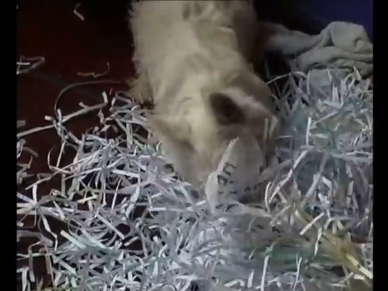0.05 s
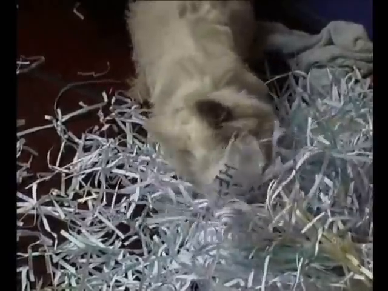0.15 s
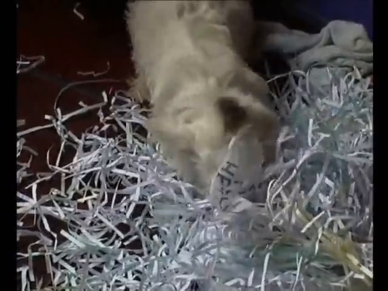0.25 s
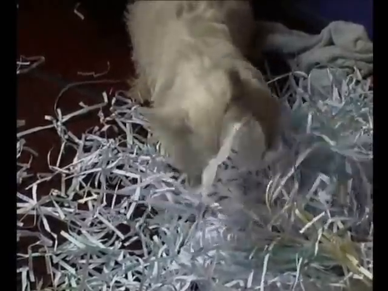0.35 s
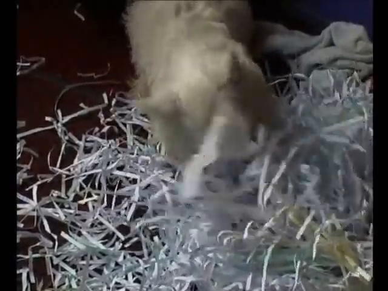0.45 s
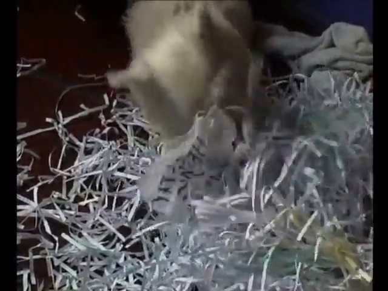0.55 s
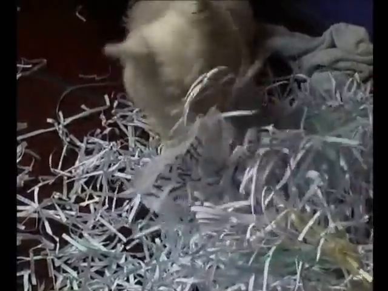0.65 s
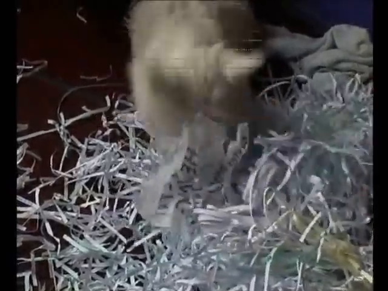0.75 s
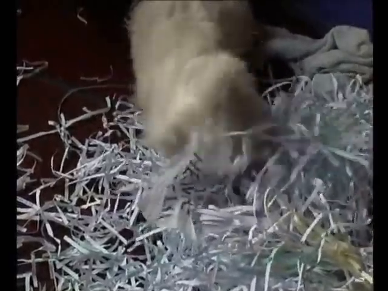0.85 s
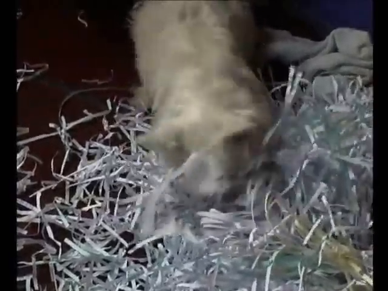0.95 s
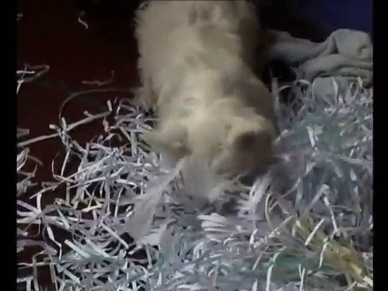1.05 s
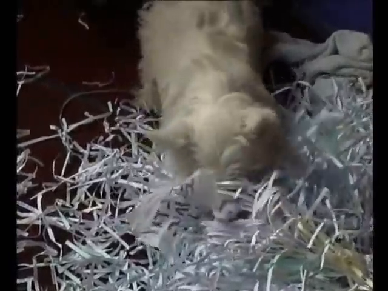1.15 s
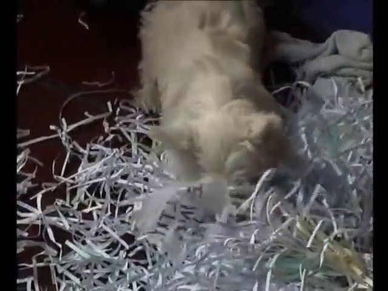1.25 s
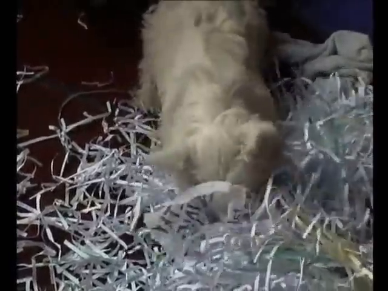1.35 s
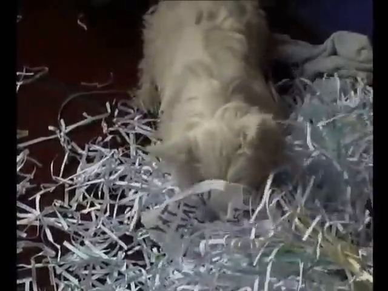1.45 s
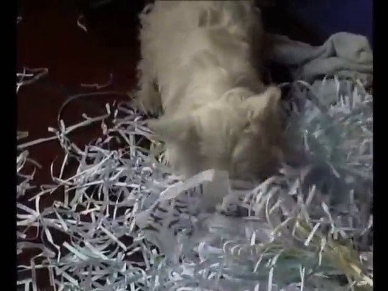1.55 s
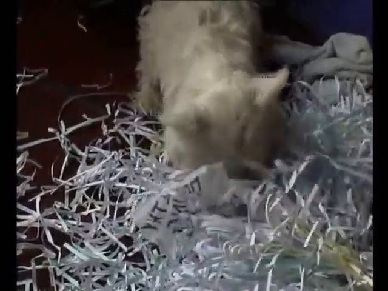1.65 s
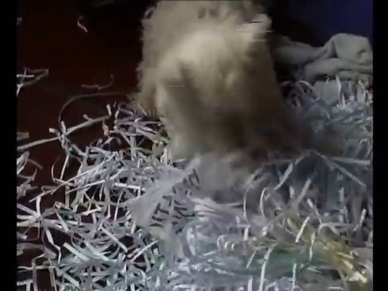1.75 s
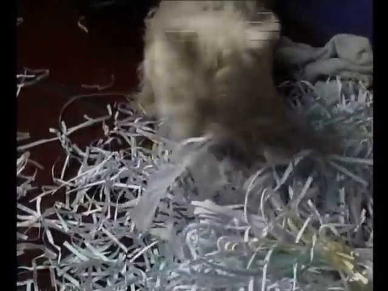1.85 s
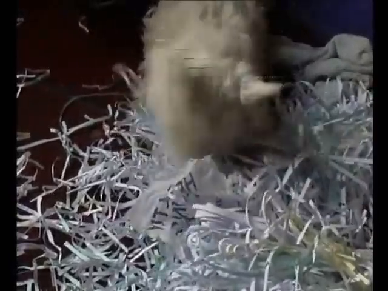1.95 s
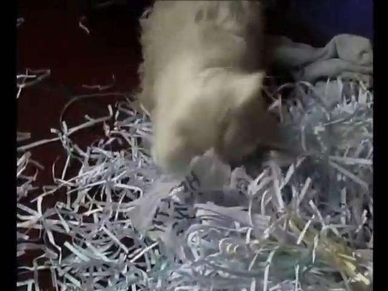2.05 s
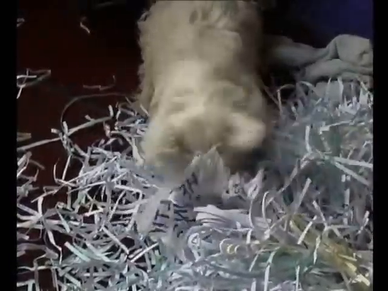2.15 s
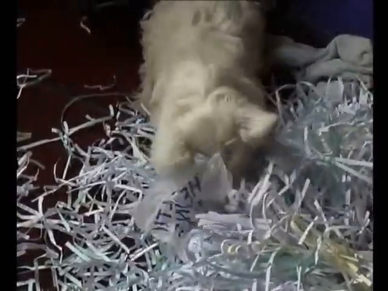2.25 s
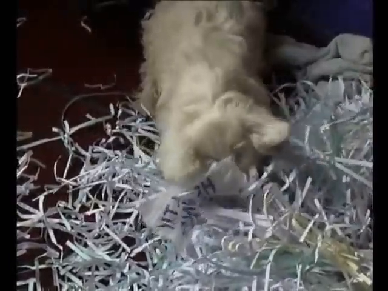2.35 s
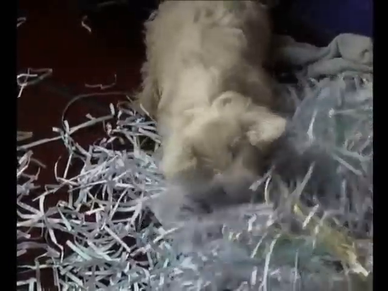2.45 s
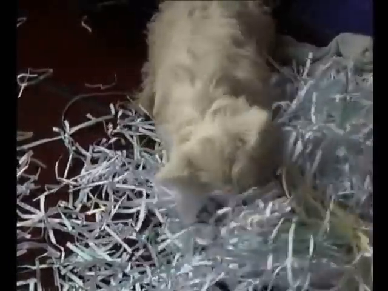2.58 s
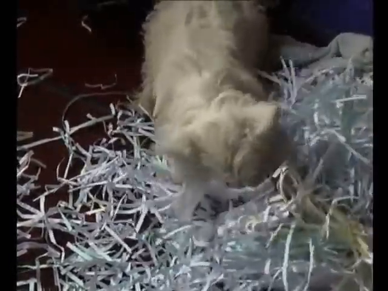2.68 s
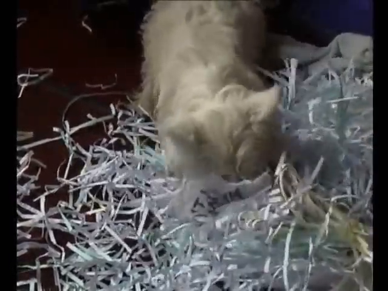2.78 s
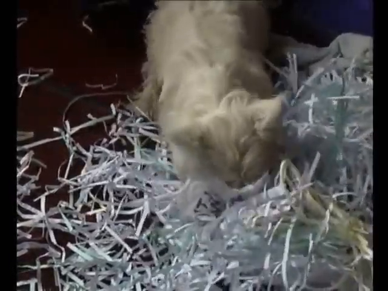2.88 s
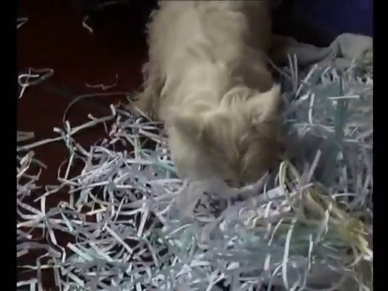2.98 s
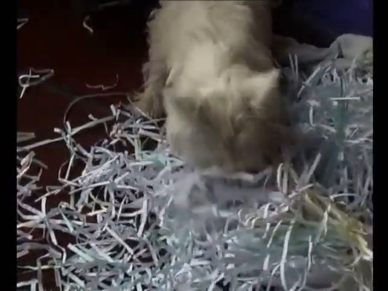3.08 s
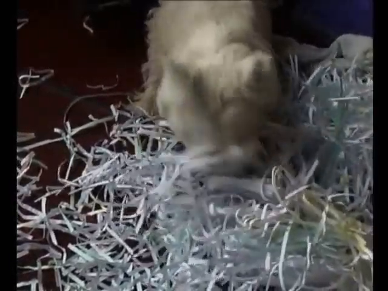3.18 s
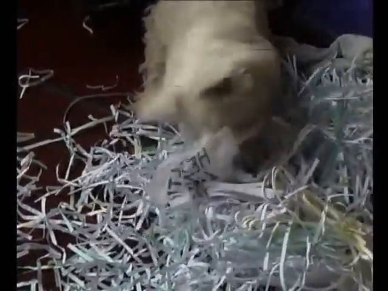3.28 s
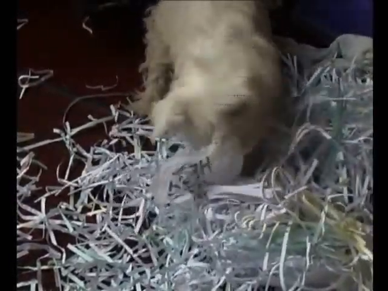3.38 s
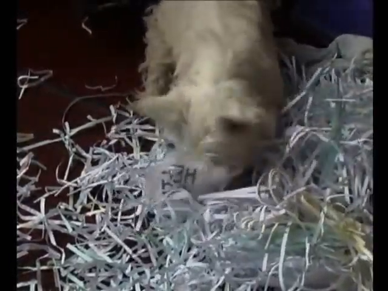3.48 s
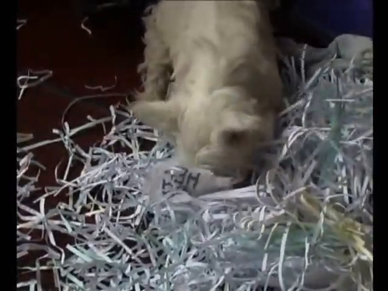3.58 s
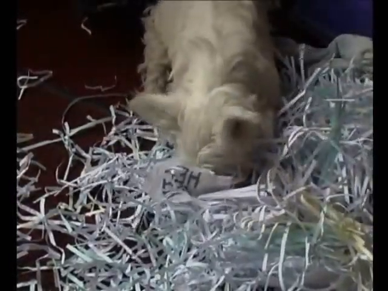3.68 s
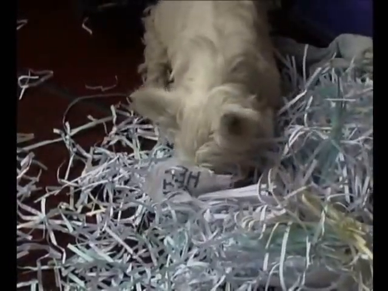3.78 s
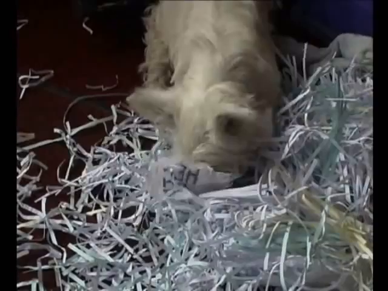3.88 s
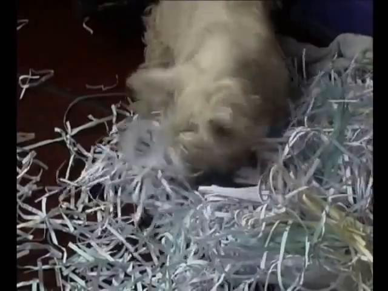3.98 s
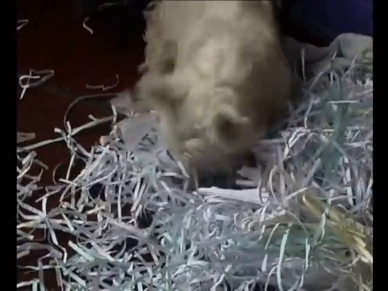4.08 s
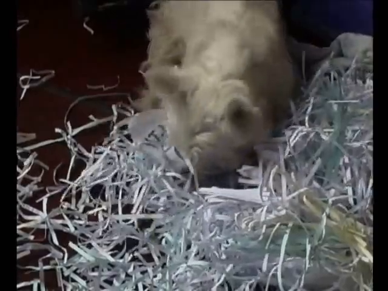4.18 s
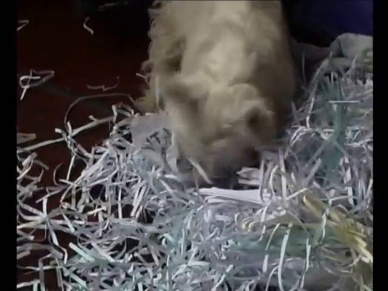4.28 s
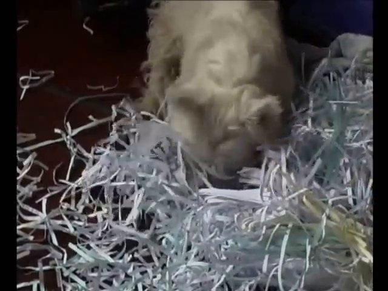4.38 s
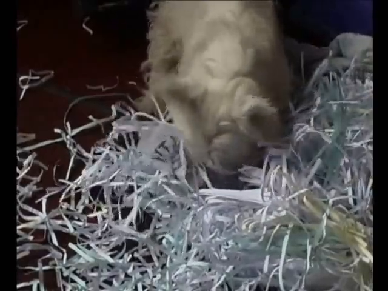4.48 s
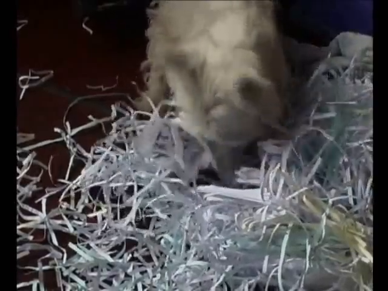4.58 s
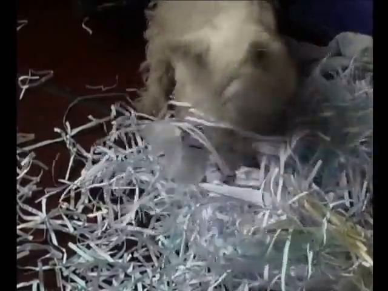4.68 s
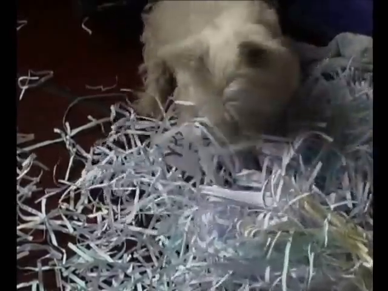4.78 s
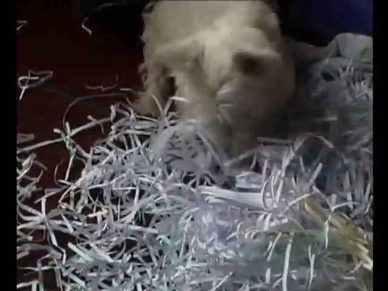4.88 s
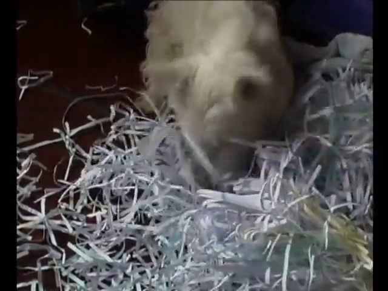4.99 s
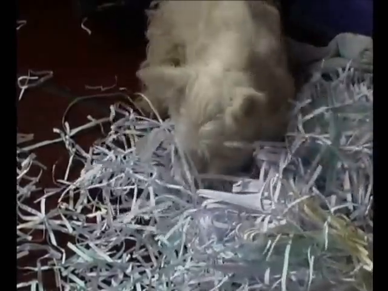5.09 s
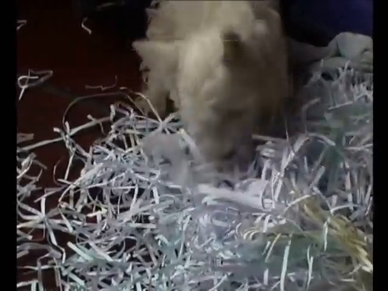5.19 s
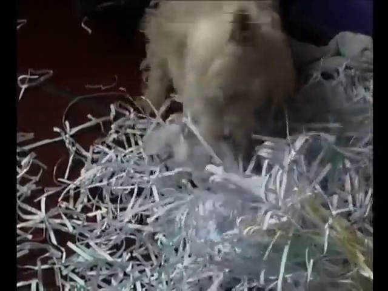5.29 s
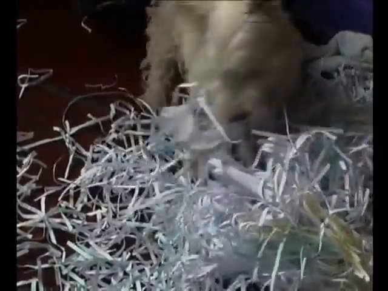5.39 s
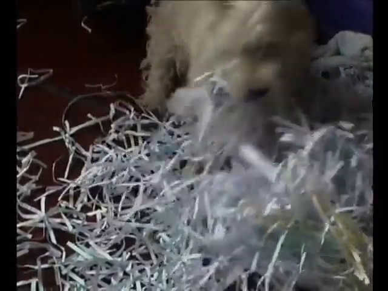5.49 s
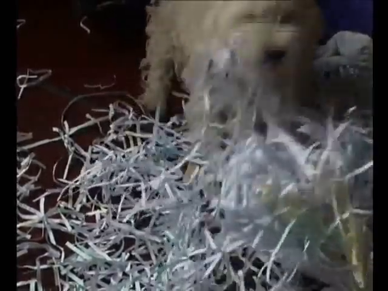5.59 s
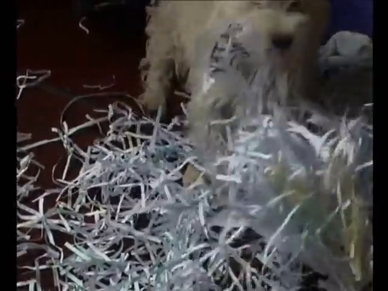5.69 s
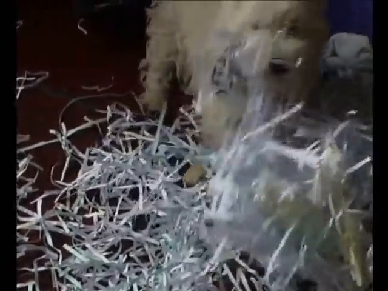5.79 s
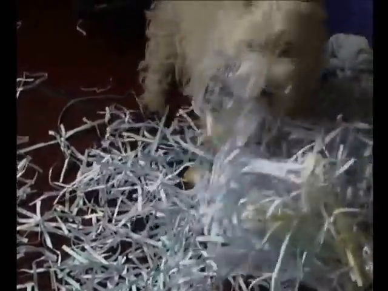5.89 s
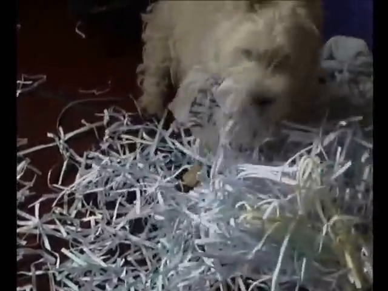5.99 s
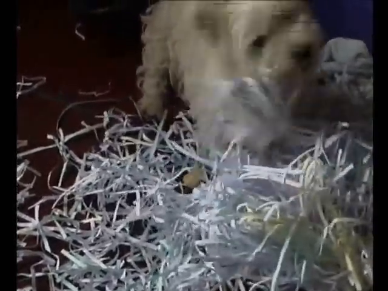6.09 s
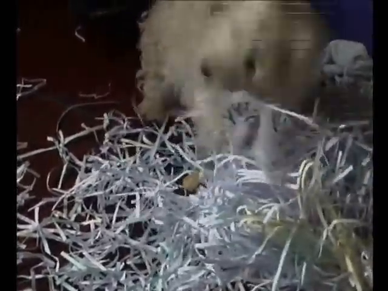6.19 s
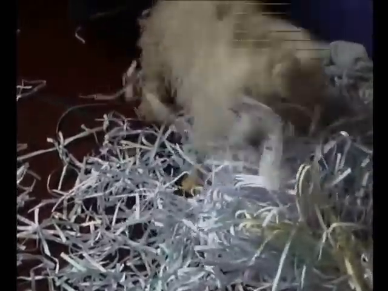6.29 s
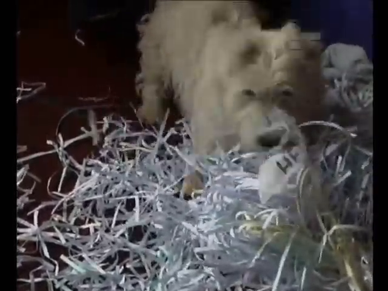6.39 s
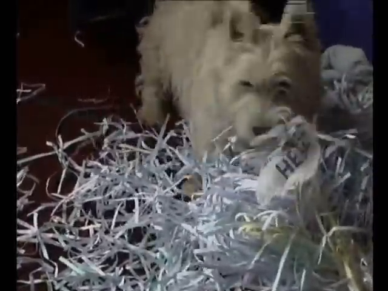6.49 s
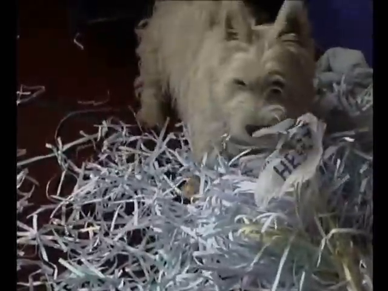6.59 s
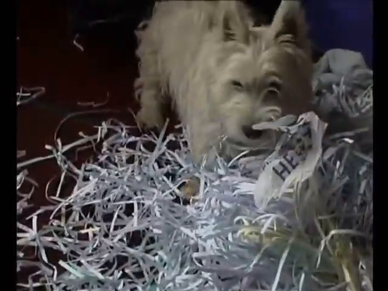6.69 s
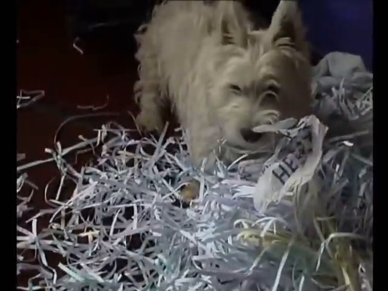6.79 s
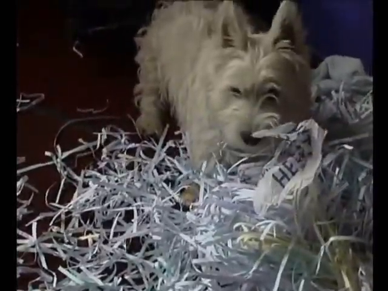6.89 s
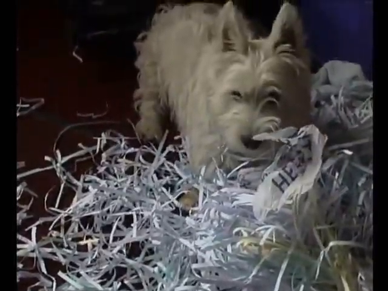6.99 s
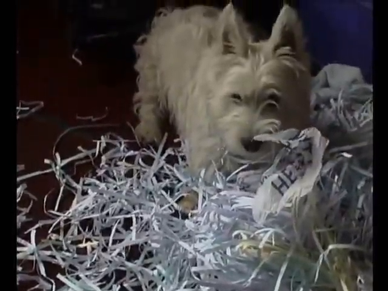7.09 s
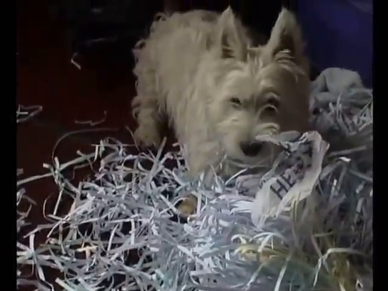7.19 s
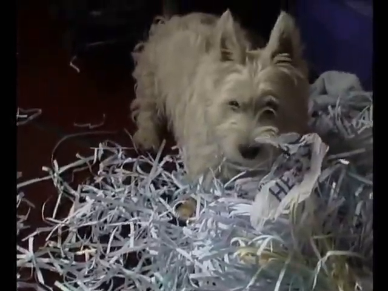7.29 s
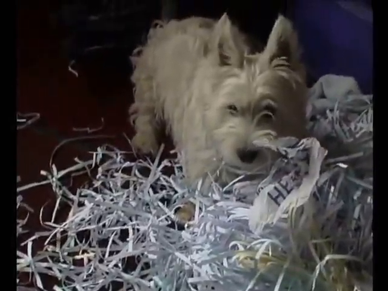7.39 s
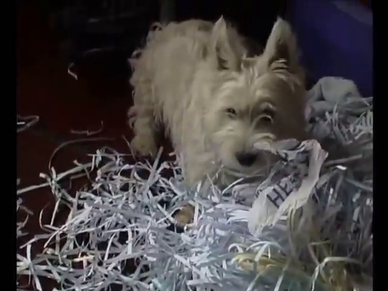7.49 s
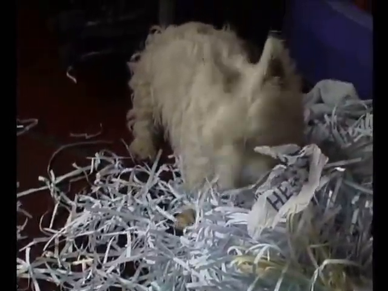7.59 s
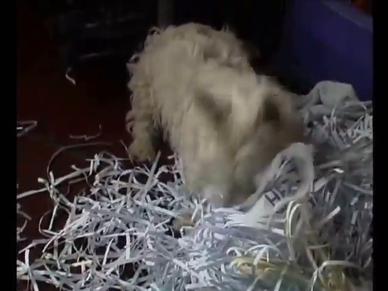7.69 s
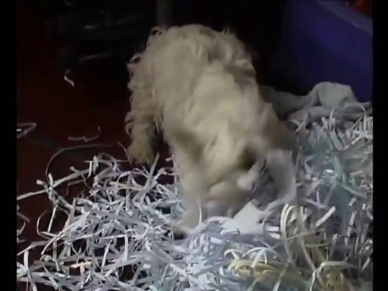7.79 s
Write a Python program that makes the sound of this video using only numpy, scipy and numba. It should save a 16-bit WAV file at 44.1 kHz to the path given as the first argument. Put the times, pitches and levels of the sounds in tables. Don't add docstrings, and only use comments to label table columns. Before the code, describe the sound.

A small dog noses and paws through shredded paper on a hard floor. Small rustles grow into dense crackling bursts with claw clicks and soft thumps, then a cluster of hard knocks and the strongest shake past the middle. It dies to near quiet, with a thin nostril whistle and tiny ticks, before a last soft rustle. Close stereo microphone, small indoor room, faint hum and hiss.

```python
import sys
import numpy as np
from scipy import signal
from scipy.fft import rfft, irfft, next_fast_len
from scipy.io import wavfile
from scipy.ndimage import uniform_filter1d
from numba import njit

SR = 44100
rng = np.random.default_rng(int(sys.argv[2]) if len(sys.argv) > 2 else 0)


def transcribe(u):
    v = np.clip(np.atleast_2d(u).T, -1, 1)
    q = np.round(v * 32767).astype(np.int16)
    wavfile.write(sys.argv[1], SR, q)


def decibels_to_gain(level_db):
    exponent = np.asarray(level_db, float) / 20
    return 10 ** exponent


N = 346185


def on_log(table, hz):
    f, v = np.transpose(table)
    return np.interp(np.log(hz), np.log(f), v)


def band(x, lo_hz, hi_hz):
    y = signal.sosfilt(signal.butter(2, [lo_hz, hi_hz], "band", fs=SR, output="sos"), x)
    return y / np.sqrt(np.mean(y ** 2))


def walk(rate_hz):
    k = int(SR / rate_hz)
    held = np.repeat(rng.standard_normal(N // k + 1), k)
    return 1.4 * uniform_filter1d(held, k)[:N]


def stereo(mid, side):
    return np.array([mid + side, mid - side])


def add(out, s, sound):
    i = int(s * SR)
    out[i:i + len(sound)] += sound[:N - i]


def ring(hz, t60_s, rise_s):
    t = np.arange(int(.25 * SR)) / SR
    push = 1 - np.exp(-t / rise_s)
    return np.sin(2 * np.pi * hz * t) * push * np.exp(-np.log(1000) * t / max(t60_s, .003))


def snaps(rate_hz, spread_db):
    when, large, sign, kept = rng.random((int(N / SR * 6000), 4)).T
    size = decibels_to_gain(-spread_db * np.log(1 - large)) * (2 * sign - 1) * (kept < rate_hz / 6000)
    x = np.bincount((when * N).astype(int), size, N)
    return x / np.sqrt(np.mean(x ** 2))


LAYER_HZ = [300, 1200, 1900, 5500, 10000]
# (frequency [Hz], density [dB per Hz])
PAPER = [(170, -7), (290, -9.5), (480, -8), (620, -3.5), (950, -3), (1200, -4), (1500, -2.5), (1900, -1),
         (2400, -1.5), (3000, -1.5), (5000, -2), (7000, -1), (9600, -5.5), (12300, -12)]
# (frequency [Hz], side minus mid [dB])
WIDTH = [(200, 0), (550, -9.5), (850, -6.5), (1400, -5), (3000, -5), (6500, -5), (8200, -3.5),
         (10000, -0.5), (12500, -3.5)]


def paper():
    crackle, heap, sheets, strips = stirring()
    layers = [heap, sheets, np.zeros(N), strips]
    shared = [snaps(900, 2.3), snaps(900, 1.9)]
    surge = 1.02 * walk(30)
    out = 0
    for hz in 190 * 2 ** np.arange(0, 6.2, 1 / 3):
        rate_hz = 4500 * np.clip(hz / 3000, .3, 1.3)
        lo_hz, hi_hz = hz * 2 ** (-1 / 6), hz * 2 ** (1 / 6)
        mid, side = (band(snaps(rate_hz, 1.3) + 0.56 * big, lo_hz, hi_hz) for big in shared)
        place = np.interp(np.log(hz), np.log(LAYER_HZ), [0, 1, 2, 2, 3])
        low = min(int(place), 2)
        colour = layers[low] + (place - low) * (layers[low + 1] - layers[low])
        density_db = on_log(PAPER, hz) + 10 * np.log10(hz / 4000)
        db = crackle + colour + density_db + surge + 1.1 * walk(18) - 5
        out = out + decibels_to_gain(db) * stereo(mid, decibels_to_gain(on_log(WIDTH, hz)) * side)
    return out


SHOVE_RISE_S, EDGE_DB = .06, 2.5


def swell(t, s, held_s, db, rise_s, fall_s):
    early = np.maximum(s - t, 0) / max(rise_s, .005)
    late = np.maximum(t - s - held_s, 0) / max(fall_s, .005)
    away = early + late
    return decibels_to_gain(2 * np.maximum(db - (10 - EDGE_DB) * away - EDGE_DB * away ** 2, -200))


# (time [s], crackle [dB])
CREEP = [(0.0, -59.6), (0.35, -64.9), (0.8, -61.7), (0.97, -58.8), (1.3, -67.2), (1.72, -55.5),
         (1.97, -66.5), (2.32, -66.7), (2.73, -55.0), (3.12, -57.8), (3.44, -70.7), (3.86, -67.4),
         (3.98, -74.6), (4.37, -57.0), (4.92, -64.9), (6.1, -67.6), (6.55, -69.8), (6.78, -84.8)]
# (peak time [s], crackle [dB], rise [s per 10 dB], fall [s per 10 dB], thin strips [dB re usual])
FLICKS = [(0.048, -55.6, 0.018, 0.024, -4.8), (0.308, -55.6, 0.031, 0.018, -0.5),
          (0.705, -53.0, 0.014, 0.057, -0.9), (1.384, -41.8, 0.067, 0.095, -3.3),
          (1.783, -43.2, 0.034, 0.072, -0.9), (1.879, -46.1, 0.06, 0.035, 1.6),
          (2.255, -59.0, 0.455, 0.104, -1.1), (2.37, -53.9, 0.048, 0.012, 0.8),
          (2.492, -47.0, 0.082, 0.012, -2.2), (2.612, -41.1, 0.115, 0.044, -0.4),
          (2.845, -49.7, 0.064, 0.074, -2.7), (2.956, -43.7, 0.033, 0.051, -1.9),
          (4.251, -51.7, 0.027, 0.04, -0.9), (4.466, -50.6, 0.035, 0.231, -0.2),
          (4.593, -49.9, 0.019, 0.023, -0.0), (4.73, -47.5, 0.108, 0.091, 1.4),
          (4.756, -46.1, 0.016, 0.086, -3.9), (5.102, -55.0, 0.248, 0.077, 0.8),
          (5.156, -49.3, 0.031, 0.282, -0.9), (5.513, -39.8, 0.012, 0.026, -2.6),
          (6.19, -54.8, 0.069, 0.012, 2.3), (6.39, -59.5, 0.141, 0.08, 0.6),
          (7.771, -55.2, 0.046, 0.242, 4.4), (7.825, -53.5, 0.062, 0.125, -3.4)]
# (full from [s], held [s], crackle [dB], fall [s per 10 dB], thin strips [dB re usual])
SHOVES = [
    (0.491, 0.179, -51.7, 0.052, 3.2),
    (1.064, 0.12, -54.7, 0.225, -1.5),
    (1.562, 0.107, -55.2, 0.013, 0.6),
    (3.193, 0.015, -53.2, 0.182, -0.6),
    (3.515, 0.062, -49.7, 0.116, -1.6),
    (4.07, 0.012, -46.6, 0.103, 0.5),
    (5.342, 0.066, -45.1, 0.15, 0.1),
    (5.572, 0.173, -43.3, 0.044, -0.8),
    (5.831, 0.13, -53.8, 0.114, -1.0),
    (6.203, 0.129, -58.6, 0.016, -3.3),
]
# (time [s], heap and sheets [dB])
DEPTH = [(0, -1), (.9, .6), (1.5, -1), (2.9, -.6), (3.25, 2.6), (3.55, -1), (5.0, -.5), (5.3, 1),
         (5.6, -.3), (6.4, .8), (7.6, 2), (7.85, 3)]
CREEP_STRIPS_DB = 1.2
STRIPS_LAG_S, STRIPS_LINGER = 0.045, 0.32
SHEETS_LAG_S, SHEETS_LINGER = 0.032, 0.26
SHEETS_FOLLOW = .3
KNOCK_SHAKES_S, KNOCK_SHEETS_DB, KNOCK_HEAP_DB = 0.028, -24, -10.5
SHEETS_MAX_DB, HEAP_MAX_DB = 1, 3


def stirring():
    t = np.arange(0, N, 64) / SR
    moves = [(swell(t, s, 0, db, rise, fall), thin) for s, db, rise, fall, thin in FLICKS]
    moves += [(swell(t, s, held, db, SHOVE_RISE_S, fall), thin) for s, held, db, fall, thin in SHOVES]
    moves += [(decibels_to_gain(2 * np.interp(t, *np.transpose(CREEP))), CREEP_STRIPS_DB)]
    power = sum(p for p, _ in moves)
    thin_db = sum(p * thin for p, thin in moves) / power
    deep_db = np.interp(t, *np.transpose(DEPTH))
    crackle = 10 * np.log10(power)

    def behind(lag_s):
        return np.interp(t - lag_s, t, crackle) - crackle

    shaken = sum(swell(t, s, 0, db, .005, KNOCK_SHAKES_S) for s, db, *_ in KNOCKS) / power
    heap = 10 * np.log10(decibels_to_gain(-3.5) + decibels_to_gain(2 * KNOCK_HEAP_DB) * shaken) - 0.15 * (crackle + 52)
    heap = np.minimum(heap, HEAP_MAX_DB) + deep_db
    sheets = 10 * np.log10(decibels_to_gain(-1.0) + decibels_to_gain(2 * KNOCK_SHEETS_DB) * shaken) - 0.076 * (crackle + 52)
    sheets = sheets + SHEETS_FOLLOW * thin_db + SHEETS_LINGER * behind(SHEETS_LAG_S)
    sheets = np.clip(sheets, -6, SHEETS_MAX_DB) + deep_db
    strips = -1.5 + thin_db + np.clip(STRIPS_LINGER * behind(STRIPS_LAG_S), -7, 4)
    return [np.interp(np.arange(N) / SR, t, c) for c in (crackle, heap, sheets, strips)]


# (time [s], ring [dB], ring [Hz], second ring [Hz], snap [dB re ring])
KNOCKS = [(.442, -57, 830, 2500, 5), (1.657, -53, 980, 1820, 5), (1.871, -35, 1850, 1950, 5),
          (2.093, -46, 1550, 2040, -3.5), (2.110, -54, 650, 1300, -8), (2.126, -49, 690, 1300, -1),
          (2.837, -50, 806, 2030, 5), (3.017, -54, 614, 1730, 2), (3.874, -58, 620, 2280, 4),
          (4.714, -42, 700, 1890, -1), (4.737, -31, 696, 1110, -8), (4.757, -37, 514, 900, -8),
          (4.793, -29.5, 725, 1010, -6), (4.848, -36, 960, 1930, 0), (5.347, -35.5, 1850, 2700, 6),
          (5.367, -43, 1770, 2730, 6.5), (5.427, -31, 1100, 750, 4), (5.513, -33, 1900, 1100, 7),
          (5.561, -37, 1030, 2500, 5), (5.611, -44, 654, 2000, 5), (5.689, -39, 960, 3020, 2),
          (6.392, -53.5, 870, 1650, 2), (6.897, -60.5, 1360, 1990, -8), (7.704, -54, 620, 2100, 4.5)]
KNOCK_T60_S, KNOCK_T60_S_PER_DB = 0.017, .0003
FLOOR_ECHO_S = 0.00157


def knocks():
    mid, side = np.zeros(N), np.zeros(N)
    t = np.arange(int(.25 * SR)) / SR
    noise = rng.standard_normal((len(KNOCKS), 2, len(t)))
    snap = ring(2880, 0.0035, .00005) + .5 * ring(5700, 0.0028, .00005) + 0.42 * ring(1600, 0.0041, .00005)
    snap = snap - 0.6 * np.roll(snap, int(FLOOR_ECHO_S * SR))
    for (s, db, hz, upper_hz, snap_db), n in zip(KNOCKS, noise):
        t60_s = KNOCK_T60_S + KNOCK_T60_S_PER_DB * (db + 44)
        body = ring(hz, t60_s, 0.0004) + 0.86 * ring(upper_hz, 0.92 * t60_s, 0.00028)
        crack = decibels_to_gain(snap_db) * (snap + 0.38 * band(n, 970, 6200) * np.exp(-t / 0.0027))
        rattle = band(n, 0.69 * min(hz, upper_hz), 1.16 * max(hz, upper_hz))
        rattle = decibels_to_gain(-11.0) * rattle * np.exp(-t / 0.012)
        add(mid, s + 0.000809, decibels_to_gain(db) * (body + crack[0] + rattle[0]))
        add(side, s + 0.00106, decibels_to_gain(db - 10.0) * (.5 * body + crack[1] + 2 * rattle[1]))
    return stereo(mid, side)


# (time [s], peak [dB], frequency [Hz])
TICKS = [
    (2.0223, -51, 5560),
    (3.8485, -50, 3500),
    (3.912, -52, 4620),
    (5.024, -47, 3600),
    (6.6114, -59, 5160),
    (6.9584, -63, 6040),
    (7.1332, -63, 2930),
    (7.4684, -63, 3630),
    (7.5338, -63, 2950),
]


def ticks():
    out = np.zeros(N)
    t = np.arange(int(.25 * SR)) / SR
    noise = rng.standard_normal((len(TICKS), len(t)))
    for (s, db, hz), n in zip(TICKS, noise):
        add(out, s, .5 * decibels_to_gain(db) * band(n, 0.28 * hz, min(2.0 * hz, 14000)) * np.exp(-t / 0.0054))
    return out


# (time [s], peak [dB], frequency [Hz], board [dB re peak])
THUMPS = [(0.491, -52.5, 120, -4), (0.559, -55, 94.2, -16), (0.919, -64, 80, -10), (1.381, -61, 119, -3),
          (1.612, -64, 67.3, -15), (1.793, -59, 119, 8.5), (1.873, -53.5, 99, 9), (2.249, -60, 100, -3),
          (2.566, -59, 86.1, 3), (2.93, -72, 118, 11), (3.148, -70, 118, 11), (3.937, -62, 75.4, -15),
          (4.77, -50, 109, 5), (5.368, -49.5, 98, -3), (5.955, -63, 91.5, -9), (6.045, -63, 101, -12),
          (6.299, -63, 76, -14), (6.411, -64, 83.4, -16), (6.869, -65, 61.9, -17),
          (7.355, -56.5, 73.6, -18), (7.419, -58, 78.1, -31), (7.66, -52.5, 75.7, -28),
          (7.748, -60, 83.4, -16)]
BOARD_HZ, THUMP_T60_S = 172, .21


def thumps():
    out = np.zeros(N)
    for s, db, hz, board_db in THUMPS:
        floor = 1.4 * ring(hz, THUMP_T60_S, 0.0073)
        board = 1.94 * decibels_to_gain(board_db) * ring(BOARD_HZ, 0.45 * THUMP_T60_S, 0.0032)
        add(out, s, decibels_to_gain(db) * (floor + board))
    return out


# (time [s], frequency [Hz], level [dB])
WHISTLE = [
    (6.3, 8119, -75),
    (6.324, 8199, -63),
    (6.336, 8500, -71),
    (6.404, 8370, -77),
    (6.408, 8330, -63),
    (6.45, 8240, -78),
]


def whistle():
    s, hz, db = np.transpose(WHISTLE)
    t = np.arange(N) / SR
    pitch_hz = np.interp(t, s, hz) * (1 + 0.00394 * walk(200))
    gain = decibels_to_gain(np.interp(t, s, db, left=-140, right=-140) + 3 * walk(130))
    return np.sqrt(2) * gain * np.sin(2 * np.pi * np.cumsum(pitch_hz) / SR)


@njit
def walls(x, lags, gain, damp):
    line, soft, out = np.zeros((8, 4096)), np.zeros(8), np.zeros((2, len(x)))
    for i in range(len(x)):
        total = 0.
        for k in range(8):
            soft[k] += (1 - damp) * (gain[k] * line[k, (i - lags[k]) & 4095] - soft[k])
            total += soft[k]
            out[k % 2, i] += soft[k]
        for k in range(8):
            line[k, i & 4095] = x[i] + soft[k] - total / 4
    return out


ROOM_T60_S, ROOM_DAMP, ROOM_DB = 0.36, 0.29, -16


def room(near):
    lags = rng.integers(250, 2200, 8)
    gain = decibels_to_gain(-60 * lags / SR / ROOM_T60_S)
    return decibels_to_gain(ROOM_DB) * walls(near.mean(axis=0) + 1e-18, lags, gain, ROOM_DAMP)


# (frequency [Hz], density [dB per Hz])
ROOM_TONE = [(15, -8), (25, 15), (40, 23), (65, 24), (100, 24.5), (200, 14.5), (310, 11.5), (630, 9.5),
             (1000, 5), (2000, 1.5), (4000, -3), (8000, -4), (11000, -1.5), (14500, -6)]
ROOM_TONE_DB = -75.5
HUM_HZ, HUM_DB, HUM_SIDE_DB = 150.4, -66, -11.5


def background():
    size = next_fast_len(N)
    hz = np.maximum(np.arange(size // 2 + 1) * SR / size, 1)
    colour = decibels_to_gain(on_log(ROOM_TONE, hz) + ROOM_TONE_DB)
    mid, side = irfft(rfft(rng.standard_normal((2, size))) * colour, size)[:, :N]
    side = signal.sosfilt(signal.butter(1, 60, "high", fs=SR, output="sos"), side)
    phase = 2 * np.pi * np.cumsum(HUM_HZ + 0.16 * walk(0.78)) / SR
    hum = np.sqrt(2) * decibels_to_gain(HUM_DB + .5 * walk(6.7))
    return stereo(mid, 0.95 * side) + hum * stereo(np.sin(phase), decibels_to_gain(HUM_SIDE_DB) * np.cos(phase))


def scene():
    near = paper() + knocks() + ticks() + thumps() + whistle()
    return near + room(near) + background()


def patches(shape, bins, frames):
    grid = rng.random((shape[0] // bins + 1, shape[1] // frames + 1))
    return np.repeat(np.repeat(grid, bins, axis=0), frames, axis=1)[:shape[0], :shape[1]]


def low_pass(x):
    return signal.sosfilt(signal.butter(12, 14020, fs=SR, output="sos"), x)


# (from [s], to [s])
MONO = [(0.52, 0.67), (0.735, 0.96), (1.117, 1.18), (1.509, 1.63), (1.793, 1.854), (1.873, 2.07),
        (2.659, 2.85), (3.388, 3.611), (3.791, 3.892), (4.156, 4.77), (4.831, 5.201), (5.375, 5.45),
        (5.549, 5.874), (6.018, 6.177)]
MONO_ABOVE_HZ, MONO_SPARES = 4130, .08
# (from [s], frequency [Hz])
TOP = [
    (0, 13020),
    (6.625, 12050),
    (6.765, 12900),
    (6.9, 13180),
    (7.23, 13700),
    (7.405, 12600),
    (7.435, 14100),
    (7.7, 13020),
]
# (from [s], to [s], low [Hz], high [Hz], share of patches)
STARVED = (6.6, 6.89, 1300, 6600, .25)


def record(dry):
    hz, s, (mid, side) = signal.stft(stereo(*dry) / 2, SR, nperseg=1024, noverlap=768)
    hz = hz[:, None]
    wide, narrow = patches(mid.shape, 12, 7), patches(mid.shape, 2, 12)
    from_s, top_hz = np.transpose(TOP)
    top_hz = top_hz[np.searchsorted(from_s, s, "right") - 1]
    keep = hz < top_hz - 450 * (wide[-1] < .2)
    t0, t1, lo_hz, hi_hz, share = STARVED
    keep &= ~((s > t0) & (s < t1) & (hz > lo_hz) & (hz < hi_hz) & (narrow < share))
    keep_side = keep.copy()
    for t0, t1 in MONO:
        keep_side &= ~((s > t0) & (s < t1) & (hz > MONO_ABOVE_HZ) & (wide > MONO_SPARES))
    kept = signal.istft(np.array([mid * keep, side * keep_side]), SR, nperseg=1024, noverlap=768)[1]
    return low_pass(stereo(*kept[:, :N]))


dry = scene()
out = record(dry)
transcribe(out)
```